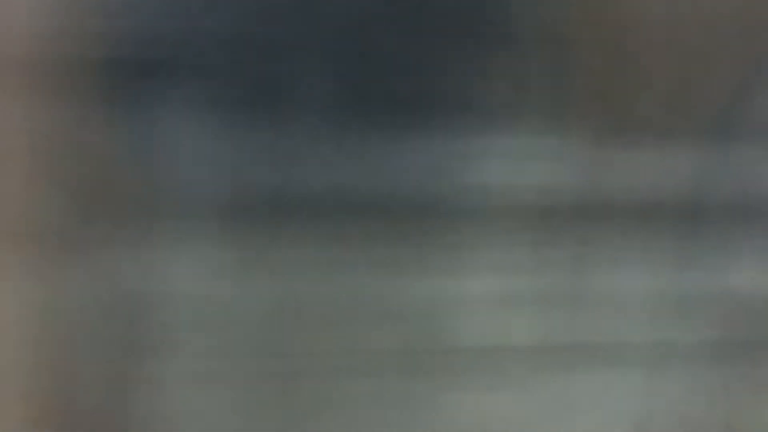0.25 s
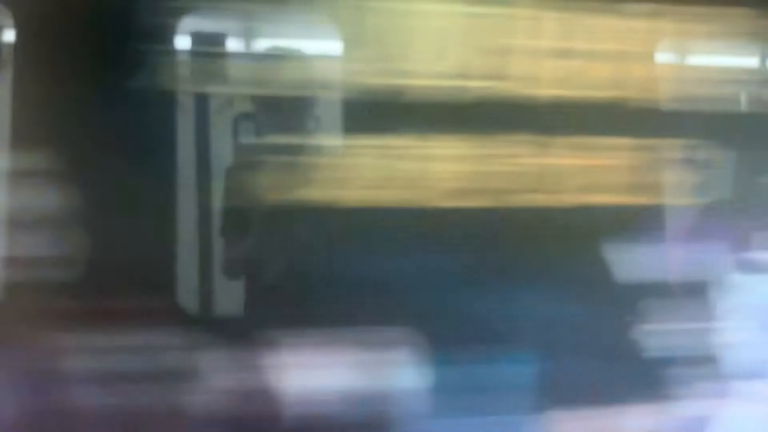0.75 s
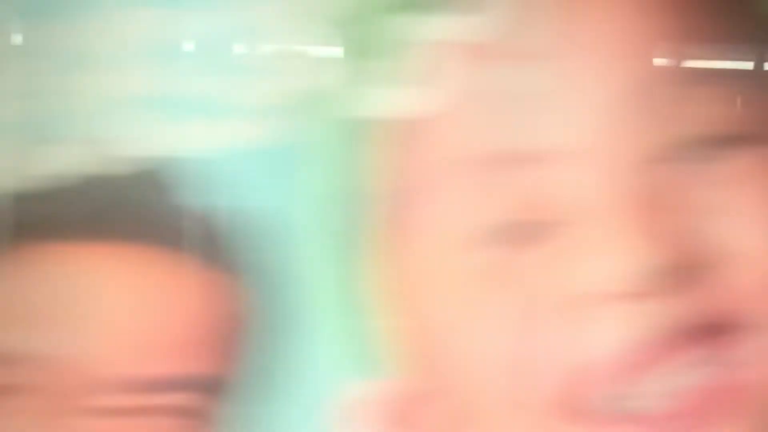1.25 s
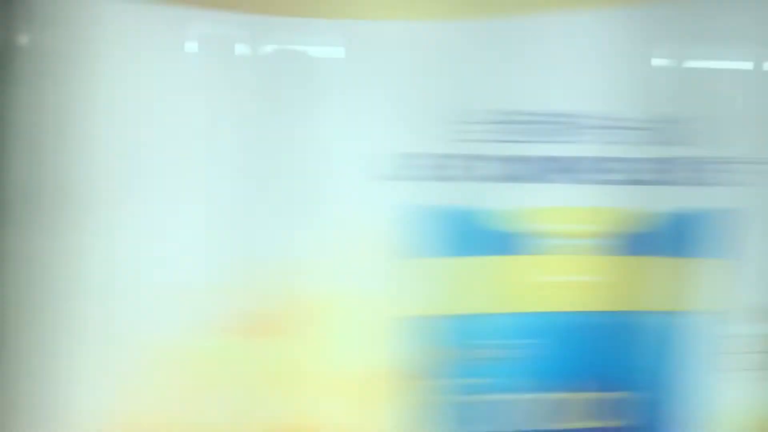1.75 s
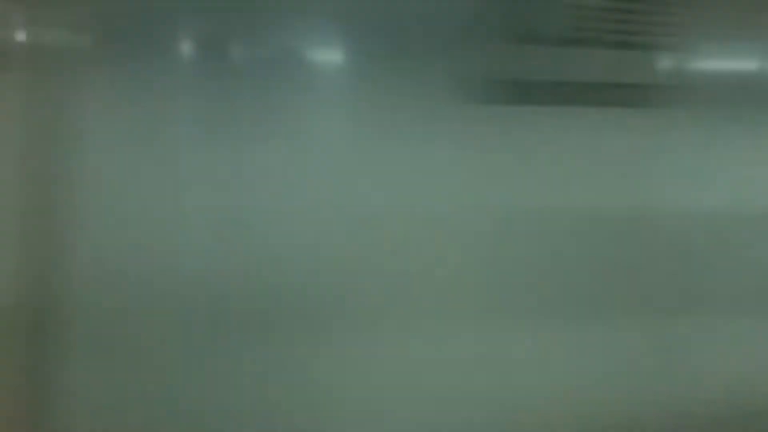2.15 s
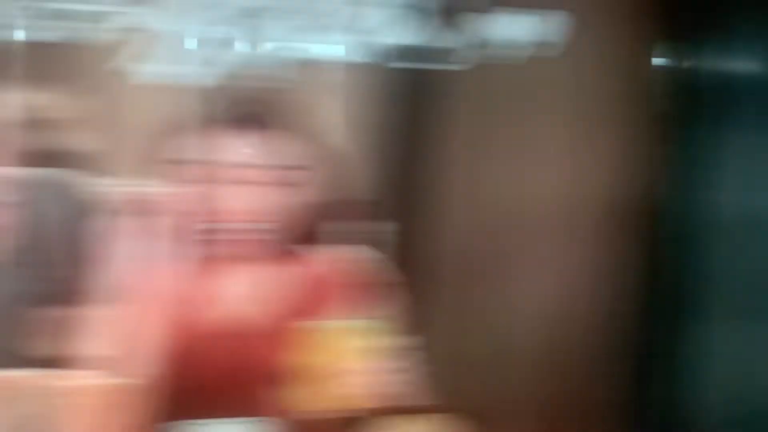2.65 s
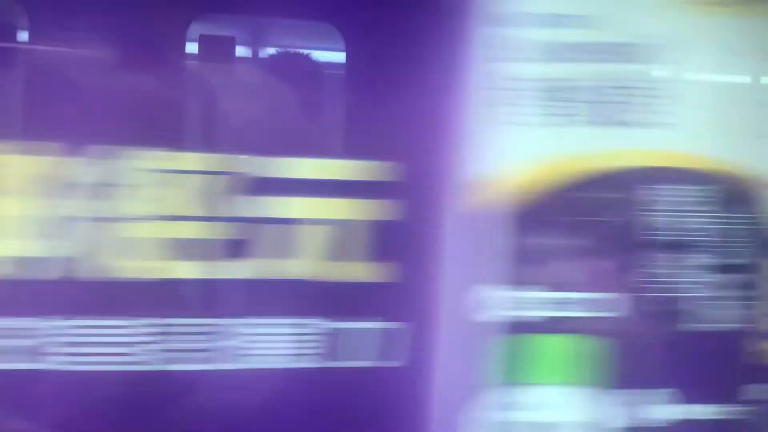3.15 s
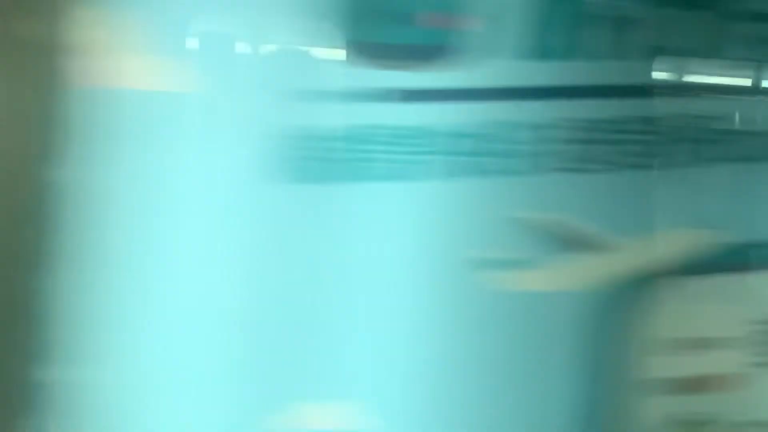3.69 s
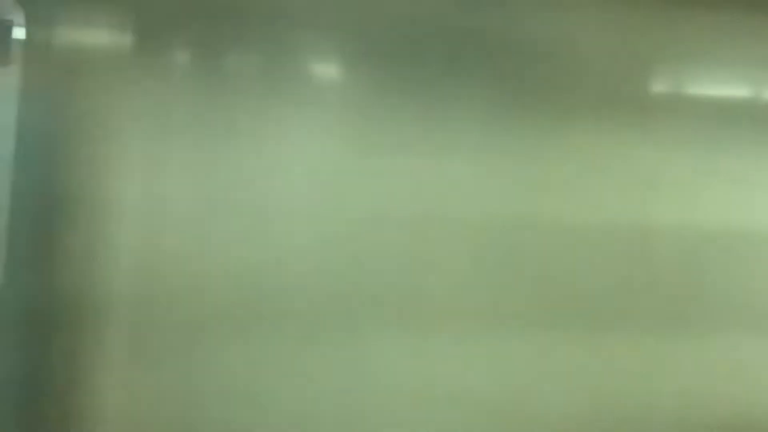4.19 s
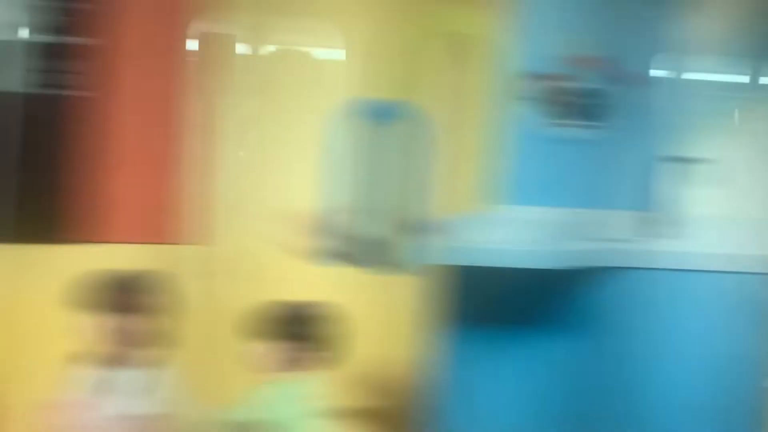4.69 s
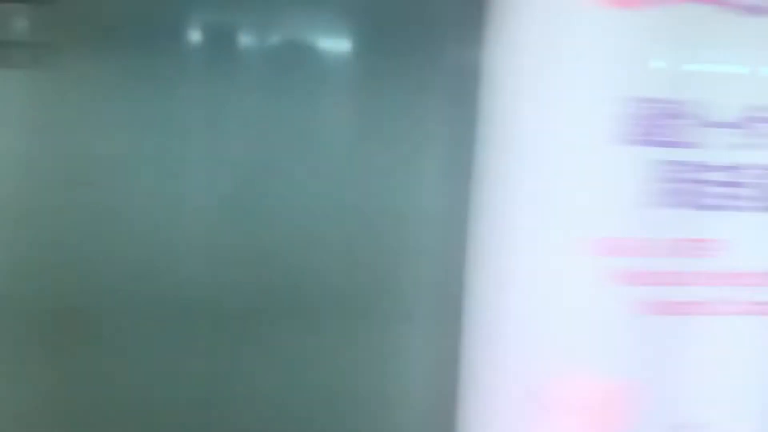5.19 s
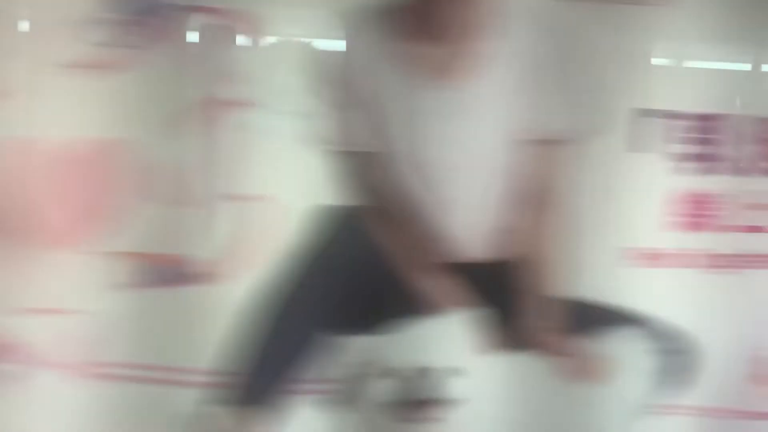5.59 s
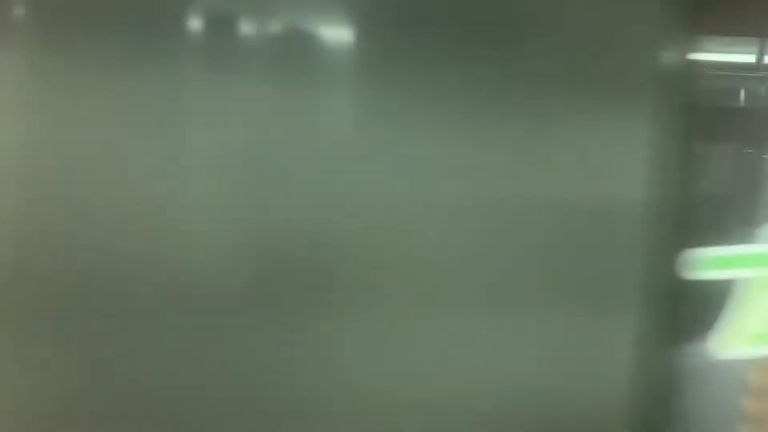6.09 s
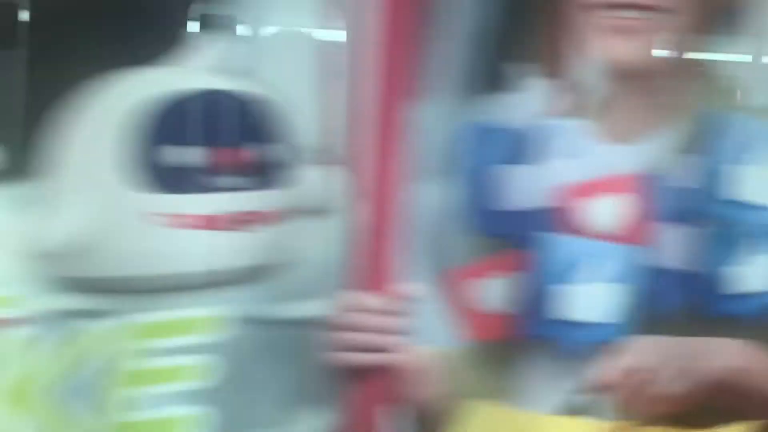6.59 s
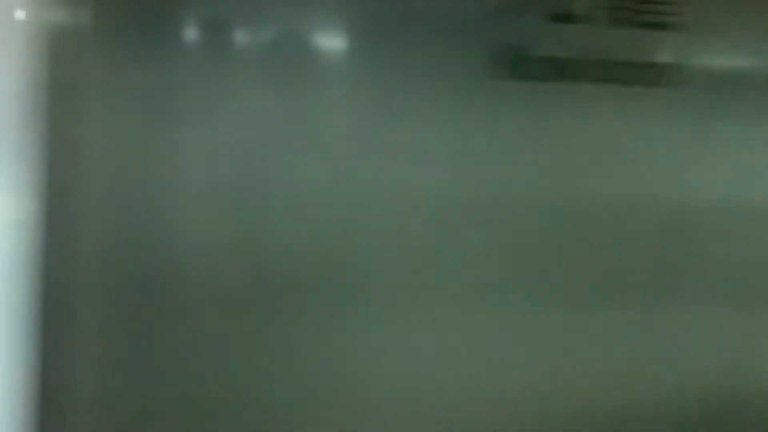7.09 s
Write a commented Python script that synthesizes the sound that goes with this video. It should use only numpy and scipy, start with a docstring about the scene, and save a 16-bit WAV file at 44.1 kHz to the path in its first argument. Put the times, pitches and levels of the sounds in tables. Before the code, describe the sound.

Heard inside an electric underground train as it brakes. A deep, uneven wheel boom shakes the floor, strongest in the first few seconds, while rolling noise gradually softens over steady duct air. Thin inverter and fan tones waver above. A gear tone drops in pitch through the middle, and a short airy valve puff stands out after five seconds. A small stereo recorder sits close within the car.

```python
"""Inside an electric underground train that brakes towards a station. The wheels drum the floor into a deep
boom, a floor panel drones, and rolling noise fades with speed over the steady ventilation. A fan and the motor
sound their tones, the traction inverter sings on multiples of its switching rate, and brake valves let out short
puffs of air. A gear tone falls in pitch. Tones are wavering sines and narrow noise; rushing is filtered noise."""
import sys
import numpy as np
from scipy import signal
from scipy.fft import rfft, irfft, next_fast_len
from scipy.io import wavfile

SR = 44100
rng = np.random.default_rng(int(sys.argv[2]) if len(sys.argv) > 2 else 0)


def decibels_to_gain(level_db):
    """Convert a level in decibels to a linear amplitude gain (20 dB per decade)."""
    exponent = np.asarray(level_db, float) / 20
    return 10 ** exponent


def bounce(signal):
    """Save signal as a 16-bit WAV file at the path given by the first command-line argument."""
    frames = np.transpose(np.atleast_2d(signal))
    limited = np.clip(frames, -1, 1)
    pcm = np.round(limited * 32767).astype(np.int16)
    wavfile.write(sys.argv[1], SR, pcm)


N = 323694  # length [samples]
SIZE = next_fast_len(N)
HZ = np.arange(SIZE // 2 + 1) * SR / SIZE  # frequency of each spectrum bin
LEFT_RIGHT = np.array([[1], [-1]])


def rms_one(x):
    """Scale to unit rms."""
    return x / np.sqrt(np.mean(x ** 2) + 1e-20)


def in_time(rows):
    """Columns of a curve, one value per sample."""
    times, *columns = np.transpose(rows)
    return [np.interp(np.arange(N) / SR, times, column) for column in columns]


def at_hz(points, hz):
    """Read a spectrum on a log-frequency axis."""
    point_hz, values = np.transpose(points)
    return np.interp(np.log(hz + 1), np.log(point_hz), values)


def drift(rate_hz):
    """Slow chance of spread 1: noise smoothed twice, made at every 40th sample and joined by lines."""
    r = np.exp(-80 * np.pi * rate_hz / SR)
    chance = rng.standard_normal(N // 40 + 2002)
    slow = signal.lfilter([1], [1, -2 * r, r * r], chance)[2000:]  # leave out the filter's start
    return np.interp(np.arange(N) / 40, np.arange(len(slow)), rms_one(slow - slow.mean()))


# how much of the sound both microphone ports share: (frequency [Hz], common share [0-1])
PORT_LIKENESS = [(60, .995), (140, .975), (190, .95), (260, .85), (350, .62), (460, .35), (600, .4),
                 (720, .55), (900, .3), (2000, .45), (4000, .5), (5200, .33), (7000, .3), (9500, .8)]
# how far the left port leads the right: (frequency [Hz], phase [radians])
LEFT_LEAD = [(0, 0.03), (190, .09), (275, .12), (350, .4), (460, .8), (600, 1.9), (720, 1.8), (800, .9),
             (920, 1.3), (1210, .5), (1550, -1.93), (2240, -3), (2930, 1.73), (4220, 6.5), (5080, 9),
             (6200, 11), (6720, 14.5), (9000, 14.1)]
# loudness balance: (frequency [Hz], left minus right [dB])
LEFT_LEAN = [(60, -3), (120, 0.5), (190, -2.5), (260, -2.5), (460, -3.5), (600, 2), (720, 1), (900, -2),
             (1380, -0.5), (3010, -1.5), (6590, -3.5)]


def diffuse(gain):
    """Spectrum of noise at two ports: a common part, shifted in phase, and a part of each port's own."""
    common, left, right = rfft(rng.standard_normal((3, SIZE)))
    alike = np.clip(at_hz(PORT_LIKENESS, HZ), 0, 1)
    shift = np.exp(.5j * LEFT_RIGHT * np.interp(HZ, *np.transpose(LEFT_LEAD)))
    pair = np.sqrt(alike) * common * shift + np.sqrt(1 - alike) * np.array([left, right])
    return gain * pair * decibels_to_gain(LEFT_RIGHT * at_hz(LEFT_LEAN, HZ) / 2)


def noise(gain):
    """Stereo noise of a given colour, unit rms."""
    return rms_one(irfft(diffuse(gain), SIZE)[:, :N])


def narrow(hz, width_hz):
    """A tone smeared into a narrow band of noise with soft skirts."""
    return noise((1 + (2 * (HZ - hz) / width_hz) ** 2) ** -.8)


def singing(hz, width_hz, noisy=0.8):
    """A tone wavering in pitch, its phase wandering between the ports, inside a narrow band of noise."""
    phase = 2 * np.pi * np.cumsum(hz + width_hz / 7 * drift(14.7)) / SR
    wander = 0.98 * (1 - at_hz(PORT_LIKENESS, hz)) * drift(2.2)
    between = np.interp(hz, *np.transpose(LEFT_LEAD)) / 2 + wander
    tone = np.sqrt(2) * np.sin(phase + between * LEFT_RIGHT)
    return np.sqrt(1 - noisy ** 2) * tone + noisy * narrow(hz, width_hz)


def wavering(hz, waver_hz, level_db):
    """Almost a sine, unsteady in pitch."""
    phase = 2 * np.pi * np.cumsum(hz + waver_hz * drift(13.1)) / SR
    return np.sqrt(2) * decibels_to_gain(level_db) * np.sin(phase)


def wheel_hz():
    """Rate of the wheel-roughness pattern: the train brakes evenly, so it falls in a straight line."""
    start_hz, slowing_hz_per_s = 81.7, 6.9
    return start_hz - slowing_hz_per_s * np.arange(N) / SR


# wheel pattern as it drives the floor, before the floor's resonance: (time [s], level [dB])
WHEEL_BEAT = [(.5, -41.5), (.65, -18.5), (.78, -12), (.86, -26), (.94, -8.5), (1.05, -39.5), (1.13, -13),
              (1.33, -13.5), (1.37, -17.5), (1.43, -11.5), (1.47, -17.5), (1.53, -8), (1.64, -16),
              (1.74, -38), (1.82, -16), (2.1, -10), (2.155, -28), (2.22, -14.5), (2.31, -13.5), (2.4, -11),
              (2.64, -19), (2.72, -14), (3.0, -27), (3.27, -27), (3.37, -16.5), (3.5, -47)]
# its second multiple, which sweeps the resonance later: (time [s], level [dB])
WHEEL_OVERTONE = [(5.3, -52), (5.6, -20), (5.9, -39), (6.19, -14.5), (6.35, -30.5), (6.6, -26.5),
                  (6.8, -39), (6.94, -26), (7.1, -52), (7.34, -31)]
# the floor ringing at its own pitch, before the same resonance: (time [s], level [dB])
FLOOR_RING = [(0, -24), (.09, -13.5), (.13, -27), (.17, -18.5), (.3, -20.5), (.348, -8), (.39, -34),
              (.52, -18), (.56, -27.5), (1.05, -28.5), (2.9, -35.5), (3.4, -39), (3.7, -24), (3.85, -24),
              (4.05, -27), (4.2, -24), (4.5, -27.5), (4.68, -20.5), (5, -31), (5.15, -20.5), (5.45, -35),
              (6, -23.5), (7.1, -34), (7.27, -24.5), (7.34, -22)]


def boom():
    """The wheel pattern and its double sweep down through the floor's resonance, which also rings unevenly."""
    wheel_waver_hz, flutter_db = 0.93, 0.7
    ring_hz, ring_waver_hz, ring_flutter_db = 69.37, 7.93, 2.5
    floor_edges_hz = (51.6, 91.5)
    beat = wavering(wheel_hz(), wheel_waver_hz, in_time(WHEEL_BEAT)[0] + flutter_db * drift(21))
    overtone_db = in_time(WHEEL_OVERTONE)[0] + flutter_db * drift(21)
    overtone = wavering(2 * wheel_hz(), 2 * wheel_waver_hz, overtone_db)
    ring_pitch = ring_hz + 0.417 * ring_waver_hz * drift(3.04)
    ring = wavering(ring_pitch, ring_waver_hz, in_time(FLOOR_RING)[0] + ring_flutter_db * drift(33.0))
    floor = signal.butter(3, floor_edges_hz, "band", fs=SR, output="sos")
    right = signal.sosfiltfilt(floor, beat + overtone + ring)
    left_lead_s = 0.00007
    left = np.interp(np.arange(N) + left_lead_s * SR, np.arange(N), right)
    return np.array([left, right]) * decibels_to_gain([[-.45], [.45]])


# floor panel's drone, before a 1.5 dB cut: (time [s], level [dB])
PANEL_DRONE = [(0.0, -38), (0.08, -31), (1.76, -26.5), (1.8, -41), (2.0, -38.5), (2.13, -20), (2.17, -43),
               (2.25, -20), (2.31, -30), (3.19, -27.5), (3.23, -35.5), (5.03, -32.5), (5.7, -38),
               (5.8, -24), (5.85, -41), (6.32, -31.5), (7.26, -45), (7.34, -49)]


def drone():
    """A floor panel's resonance, shaken at random: a blurred tone that comes and goes."""
    return decibels_to_gain(in_time(PANEL_DRONE)[0] - 1.5) * singing(189, 20)  # pitch and width [Hz]


def sway():
    """Heavy, slow pressure noise, mostly under 50 Hz, with a wandering level."""
    level_db = -52.5 + 2.5 * drift(1.1)
    return decibels_to_gain(level_db) * noise((HZ > 18) * np.sqrt(HZ) / (1 + (HZ / 47) ** 10))


# car body resonances: (frequency [Hz], width [Hz], boost [dB])
BODY_RESONANCES = [(189, 30, 2), (478.3, 31.6, 9.5), (1160, 210, 6.5), (697, 84, 7.5), (806, 67, 6),
                   (125, 115, 4), (341.5, 180, 5), (1647, 65, 6.5), (2024, 230, 6), (2250, 33, 7.5),
                   (3220, 450, 4), (144, 11, 4), (211, 4.1, 2), (273.7, 10, 4.5), (324, 4.5, 1.5),
                   (368.3, 12, 4), (1290, 44, 2), (1810, 50, 3), (2460, 60, 1.5), (3530, 74, 2.5),
                   (4350, 85, 2)]


def body():
    """Gain of the car body's resonances, whose boosts add up where they overlap."""
    return decibels_to_gain(sum(db / (1 + (2 * (HZ - hz) / width) ** 2) for hz, width, db in BODY_RESONANCES))


# wheels on rails, before a 3.5 dB cut: (time [s], level [dB], treble tilt [dB per octave])
ROLLING_COURSE = [(0, -19, 0.5), (.4, -20, 1), (1, -22.5, 1), (1.7, -21.5, 0.93), (2.2, -22.5, 1),
                  (3, -23, 1), (3.6, -25, 1.5), (4.4, -24.5, 1), (5.2, -25, 1.5), (6, -26, 1.5),
                  (6.7, -27.5, 1.8), (7.34, -25.5, 2)]
# colour of the rolling noise, before the car body: (frequency [Hz], level [dB per Hz])
ROLLING_COLOUR = [(20, -51), (44, -41.5), (55, -4.5), (70, -1.5), (87, -6), (108, -16), (190, -17),
                  (235, -18.5), (467, -31), (803, -33.5), (947, -42.5), (2490, -46), (4800, -54.5),
                  (5200, -59), (7000, -66.5), (8300, -102.5)]


def rolling():
    """Rough wheels on rough rail; each octave swells a little on its own and the treble follows the tilt."""
    patchy_db = 1.3
    level_db, tilt_db = in_time(ROLLING_COURSE)
    whole = diffuse(decibels_to_gain(at_hz(ROLLING_COLOUR, HZ)) * body())
    together = drift(3.7)  # swelling that all octaves share
    scale = np.std(irfft(whole * (HZ > 100) * (HZ < 700), SIZE))  # the level counts in this band
    out = 0
    for octave in range(-4, 6):  # octaves away from 400 Hz
        share = np.clip(1 - abs(np.log2(HZ / 400 + 1e-9) - octave), 0, 1)
        swell_db = patchy_db * (0.36 * together + drift(8.1) + 0.99 * drift(4.4))
        out = out + decibels_to_gain(swell_db + tilt_db * octave) * irfft(whole * share, SIZE)[:, :N]
    return decibels_to_gain(level_db - 3.5) * out / scale


# colour of the duct air, before the car body: (frequency [Hz], level [dB per Hz])
AIR_COLOUR = [(25, -40.5), (47, -32), (70, -1), (284, -25), (591, -40.5), (947, -26), (1170, -28),
              (2210, -33), (2610, -44.5), (4600, -47), (5200, -58.5), (7000, -70.5), (9800, -59),
              (12000, -63)]
# steady tones: a low hum, the inverter switching rate's sixth and seventh multiples, a faint high line:
# (frequency [Hz], level [dB], width [Hz])
STEADY_TONES = [(118, -35, 3), (4799, -72, 12), (5599, -78, 12), (10210, -92, 30)]


def ventilation():
    """Smooth steady air noise from the ceiling ducts, along with the steady tones."""
    air = decibels_to_gain(-32.5) * noise(decibels_to_gain(at_hz(AIR_COLOUR, HZ)) * body())
    return air + sum(decibels_to_gain(db) * singing(hz, width, noisy=.5) for hz, db, width in STEADY_TONES)


# main tone of the cooling fan: (time [s], level [dB])
FAN_TONE = [(0.0, -47), (0.04, -48.5), (0.75, -58.5), (1.08, -50.5), (5.09, -52), (6.13, -40), (6.5, -57),
            (6.79, -35.5), (6.91, -58), (7.34, -54)]


def fan():
    """A cooling fan's thin blade tone rises and falls in level; its fourth multiple stays at one level."""
    blade_hz = 695.8
    blade = decibels_to_gain(in_time(FAN_TONE)[0]) * singing(blade_hz, 3, noisy=.3)
    return blade + decibels_to_gain(-66.5) * singing(4 * blade_hz, 10, noisy=.4)


# uneven level of multiples one to four of the inverter's switching rate, before a 0.5 dB lift.
# each: (time [s], level [dB])
FIRST_MULTIPLE = [(0.0, -54), (0.12, -37), (0.75, -37), (0.88, -37), (1.1, -52), (1.22, -41), (2.72, -48),
                  (2.88, -61), (2.94, -40), (3.25, -50), (3.7, -42), (3.74, -63), (3.8, -43), (3.88, -64),
                  (3.93, -42), (4.68, -48), (4.82, -40), (5.25, -51), (5.27, -39), (5.38, -47), (5.52, -42),
                  (5.66, -53), (5.7, -41.5), (6.48, -58), (6.62, -42), (6.71, -64), (6.97, -39),
                  (7.09, -57), (7.2, -43.5), (7.34, -53)]
SECOND_MULTIPLE = [(0.0, -61.5), (0.59, -56), (1.31, -61), (1.33, -54.5), (1.94, -59), (2.13, -51.5),
                   (2.88, -53), (3.0, -43), (3.04, -51), (3.82, -57), (4.0, -48), (4.07, -58),
                   (4.37, -53.5), (5.03, -56), (5.31, -57), (5.38, -60.5), (6.38, -50.5), (6.54, -61),
                   (6.71, -55), (7.34, -57)]
THIRD_MULTIPLE = [(0.0, -59), (0.1, -61), (0.14, -54), (0.75, -55.5), (0.78, -60), (1.2, -52.5),
                  (1.64, -68.5), (1.8, -61), (3.09, -61.5), (3.25, -58), (3.47, -63), (3.51, -60),
                  (3.66, -64), (3.96, -57), (4.29, -64), (4.33, -53), (4.4, -63), (4.54, -57), (4.64, -64),
                  (4.76, -50), (4.84, -55.5), (5.46, -52), (5.48, -51), (5.52, -63), (5.56, -58),
                  (5.68, -63), (5.78, -47), (5.85, -63), (5.89, -50), (5.95, -65), (5.99, -41), (6.03, -49),
                  (6.15, -62), (6.19, -43), (6.27, -58), (6.32, -48), (6.46, -53), (6.5, -45), (6.58, -64),
                  (6.62, -50), (6.66, -59), (6.83, -46), (6.85, -54), (7.26, -49.5), (7.3, -64),
                  (7.34, -49)]
FOURTH_MULTIPLE = [(0, -65), (2.999, -71), (5.5, -73), (6.4, -66), (7.34, -62)]
# blur of multiples one to four: (width [Hz], noisy share [0-1])
MULTIPLE_BLUR = [(16, .55), (45, .8), (30, .2), (12, .4)]


def inverter():
    """Wavering multiples of the switching rate; the motor current splits each into blurred sidebands too."""
    switch_hz, sideband_hz, spurt_db = 799.8, 26, 1.3
    sidebands_db = (-10, -4, -3.5, -8)  # against multiples one to four
    curves = (FIRST_MULTIPLE, SECOND_MULTIPLE, THIRD_MULTIPLE, FOURTH_MULTIPLE)
    out = 0
    for k, (curve, side_db, blur) in enumerate(zip(curves, sidebands_db, MULTIPLE_BLUR), 1):
        sides = 0
        for sign in (-1, 1):
            sides = sides + decibels_to_gain(spurt_db * drift(21)) * narrow(k * switch_hz + sign * sideband_hz, 22.0)
        line = decibels_to_gain(spurt_db * drift(15)) * singing(k * switch_hz, *blur)
        out = out + decibels_to_gain(in_time(curve)[0] + 0.5) * (line + decibels_to_gain(side_db) * sides)
    return out


# blurred tones of the motor, each swelling once:
# (frequency [Hz], width [Hz], level [dB], swell time [s], swell [dB], half length [s])
MOTOR_SWELLS = [(1940, 68, -72, 3.9, 6, .7), (2820, 120, -62, 3.7, 7, 0.88), (2800, 92, -69, 4.8, 16, 0.33),
                (2420, 260, -71, 0.47, 8.5, 1.3), (2310, 110, -66, 4.9, 12, 1.8),
                (1100, 110, -57.5, 0.99, 16, 0.068), (3190, 43, -70, 6.5, 16, .5),
                (3100, 70, -73.5, 7.2, 11, .2), (2700, 70, -74.5, 6, 11.5, .25)]


def motor():
    """Broad, unsteady tones of the motor: narrow bands of noise."""
    t = np.arange(N) / SR
    out = 0
    for hz, width, db, s, swell_db, half in MOTOR_SWELLS:
        level_db = db + swell_db * np.exp(-((t - s) / half) ** 2) + 2.5 * drift(9.9)
        out = out + decibels_to_gain(level_db) * narrow(hz, width)
    return out


# thin high whistle, level of each line: (time [s], level [dB])
WHISTLE_LEVEL = [(0, -84), (2.45, -84), (2.7, -100), (7.34, -100)]


def whistle():
    """Two close, faint, high lines of narrow noise, which drop away early on."""
    return decibels_to_gain(in_time(WHISTLE_LEVEL)[0]) * sum(narrow(hz, 25.0) for hz in (10955, 11095))


# air from the valves: (time [s], hiss level [dB], roar level [dB], rise [s], decay [s])
AIR_PUFFS = [(.12, -74.5, -64.5, 0.076, 0.18), (0.701, -62.5, -65, 0.02, 0.028),
             (1.65, -63, -74, 0.03, 0.022), (1.78, -61, -63.5, 0.036, 0.033),
             (3.019, -70.5, -80, 0.11, 0.096), (4.92, -83.5, -48, 0.013, 0.011),
             (5.284, -56, -33.5, 0.023, .05), (6.3, -77.5, -64, 0.034, 0.038),
             (7.15, -74, -78, 0.035, 0.081)]
# colours of the puffs' two noises, each: (frequency [Hz], level [dB per Hz])
BRIGHT_HISS = [(3000, -15), (5000, -10), (7000, -2), (9300, 4), (10200, 0.5), (10900, -6), (12300, -4),
               (14000, -35.5)]
DULL_ROAR = [(300, -7.5), (700, 5.5), (1500, 6), (3000, -2.5), (5000, -13), (7000, -31.5), (9000, -50)]


def puffs():
    """A brake valve opens: bright hiss and a duller roar swell and die raggedly."""
    t, hiss, roar = np.arange(N) / SR, np.zeros(N), np.zeros(N)
    for s, hiss_db, roar_db, rise, decay in AIR_PUFFS:
        shape = np.exp(-((t - s) / np.where(t < s, rise, decay)) ** 2)
        hiss += decibels_to_gain(hiss_db) * shape
        roar += decibels_to_gain(roar_db) * shape
    ragged = decibels_to_gain(2.6 * drift(70))
    bright = hiss * noise(decibels_to_gain(at_hz(BRIGHT_HISS, HZ)))
    dull = roar * noise(decibels_to_gain(at_hz(DULL_ROAR, HZ)))
    return ragged * (bright + dull)


# load on the gears, as the level of their tone: (time [s], level [dB])
GEAR_LOAD = [(2.5, -54), (3.0, -45), (3.3, -33.5), (3.55, -39.5), (3.75, -39), (4.05, -35), (4.5, -53.5),
             (5.5, -45), (6, -34), (6.3, -42), (6.6, -66)]


def gear():
    """The tooth-meshing tone sinks with speed; it is louder while the brakes load the gears."""
    teeth_per_beat = 4.12  # gear tone over the wheel pattern's rate
    phase = 2 * np.pi * np.cumsum(teeth_per_beat * wheel_hz() + 0.88 * drift(3.0)) / SR
    return np.sqrt(2) * decibels_to_gain(in_time(GEAR_LOAD)[0] + 2.2 * drift(14.0)) * np.sin(phase)


def scene():
    """Everything heard in the car."""
    floor = boom() + drone() + sway()
    rushing = rolling() + ventilation()
    machines = fan() + inverter() + motor()
    return floor + rushing + machines + whistle() + puffs() + gear()


def low_pass(x):
    """Removes everything above the highest recorded frequency."""
    return signal.sosfilt(signal.butter(12, 12400, fs=SR, output="sos"), x)


def record(dry):
    """A small stereo recorder rounds its peaks and is nearly deaf in one high band where its ports cancel."""
    notch_hz, width_hz, depth_db = 8630, 1370, -17.5
    rounded = .9 * np.tanh(dry / .9)
    notch = decibels_to_gain(depth_db * np.exp(-(2 * (HZ - notch_hz) / width_hz) ** 4))
    mix = irfft(rfft(rounded, SIZE) * notch, SIZE)[:, :N]
    return low_pass(mix)


dry = scene()
out = record(dry)
bounce(out)
```